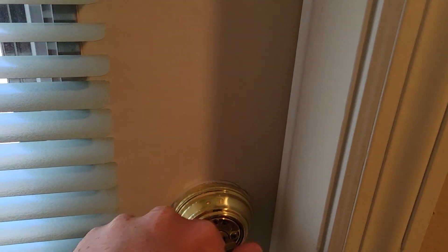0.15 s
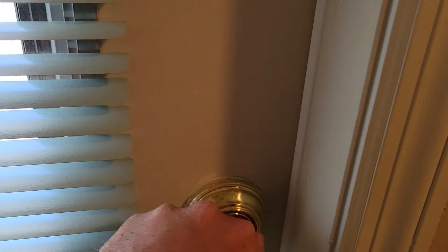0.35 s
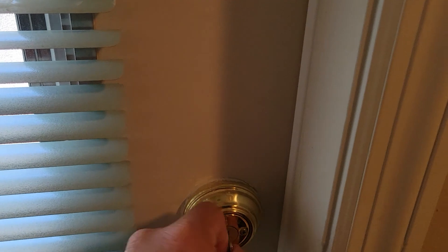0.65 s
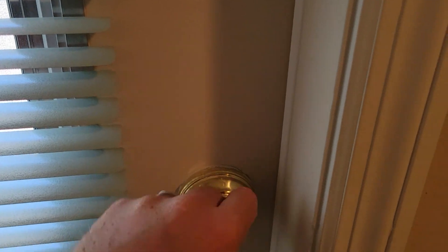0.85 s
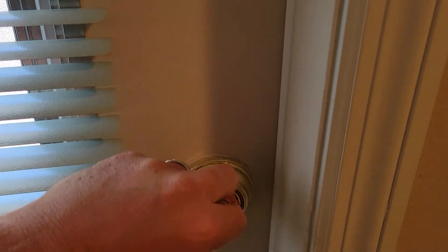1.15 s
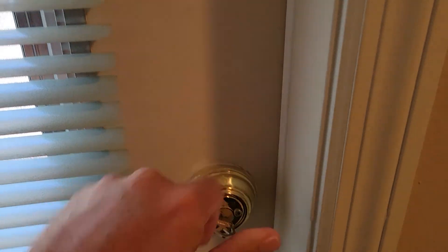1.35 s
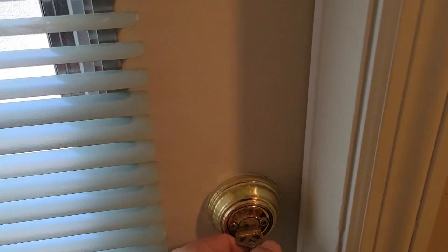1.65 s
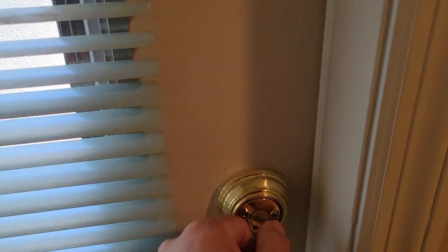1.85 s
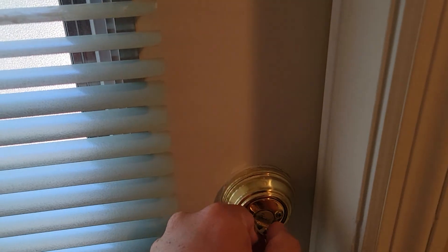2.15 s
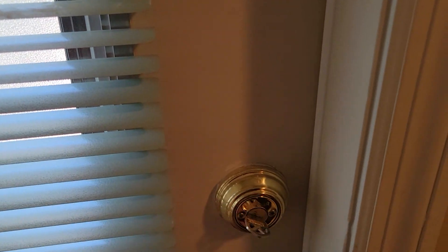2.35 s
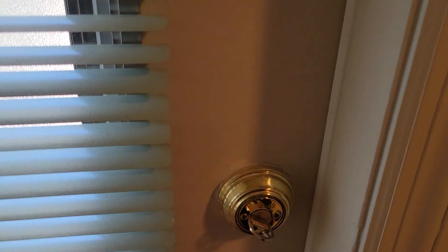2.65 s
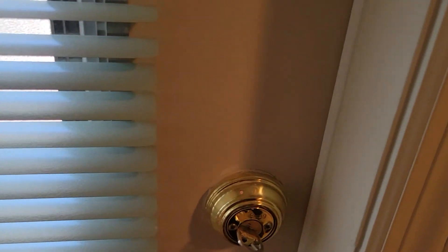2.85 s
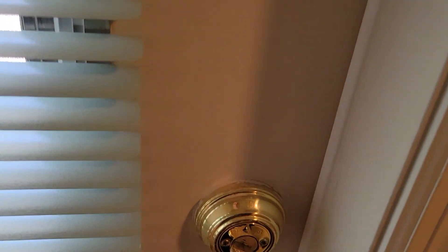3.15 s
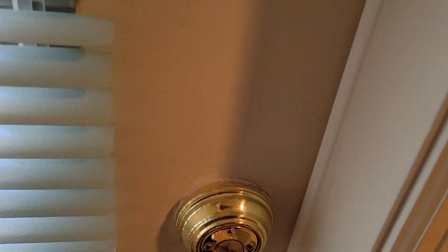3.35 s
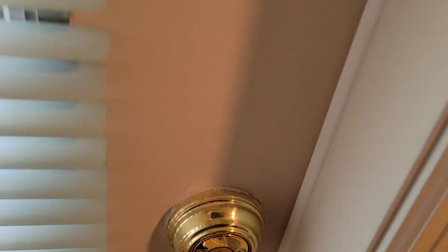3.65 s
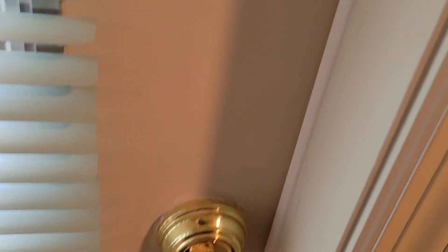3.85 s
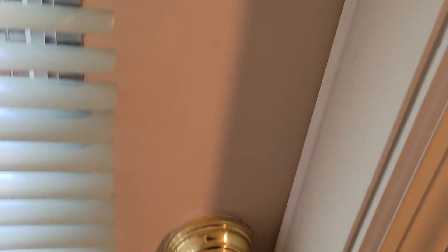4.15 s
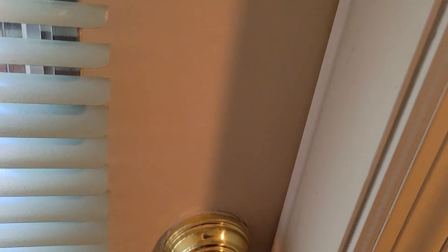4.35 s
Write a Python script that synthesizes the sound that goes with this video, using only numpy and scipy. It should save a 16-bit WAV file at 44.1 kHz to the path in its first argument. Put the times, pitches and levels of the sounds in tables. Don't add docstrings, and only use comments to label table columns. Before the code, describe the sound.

Inside a small, quiet hallway with low rumble and faint mains hum, a hand rustles on a brass knob. Light ticks and loose metal rattles come first, then a near pause. The stiff door knocks dully as it is tried, and finally shuts with a loud thump and bright latch snap. Close stereo microphone, short dry reverberation.

```python
import sys
import numpy as np
from scipy import signal
from scipy.fft import rfft, irfft, next_fast_len
from scipy.io import wavfile

SR = 44100
rng = np.random.default_rng(int(sys.argv[2]) if len(sys.argv) > 2 else 0)


def linear_from_db(decibels):
    return 10 ** (np.asarray(decibels, float) / 20)


def dump(signal):
    limited = np.clip(np.atleast_2d(signal).T, -1, 1)
    pcm = np.round(limited * 32767).astype(np.int16)
    wavfile.write(sys.argv[1], SR, pcm)


N = 198062

# frequency in Hz, level in dB rms.
HUM = [
    (118.4, -61.5),
    (242.2, -87),
]
# frequency in Hz, level in dB per Hz.
AIR_SPECTRUM = [(15, -37), (25, -12), (60, 0), (87, -57), (103, -37.5), (124, 7), (187, -57), (252, -13),
                (470, -26), (553, -25), (669, -31), (2210, -31), (8600, -45.5), (15200, -55), (16500, -63)]
# frequency in Hz, correlation up to 1 (below 0 counts as
AIR_LIKENESS = [(60, 0.68), (240, 0.56), (950, -0.62), (3770, -0.13), (15000, -0.02)]
# frequency in Hz, width in Hz, left gain in dB, right gain in dB.
PORT_RESONANCES = [(8580, 2900, 0, -32), (13400, 430, -4, 5.5)]

# frequency in Hz, level in dB, t60 in seconds.
LEAF_MODES = [(50, -6.5, 0.074), (71.6, -7, 0.22), (94.5, 0.5, 0.27), (126, 2, 0.19), (143.6, -1.5, 0.24)]
# frequency in Hz, level in dB, t60 in seconds.
PANEL_MODES = [(174.8, -4, 0.3), (220.7, 1.5, 0.16), (266.2, 2, 0.12), (306.5, -4, 0.27), (372.5, -4, 0.15)]
# frequency in Hz, level in dB, t60 in seconds.
KNOB_MODES = [(517.4, -3, 0.03), (551.2, -7.5, 0.084), (611, -3, 0.015), (670, -11, 0.052),
              (835, -2.5, 0.0093), (832, -4, 0.023)]
# frequency in Hz, level in dB, t60 in seconds.
LATCH_MODES = [(1160, -6, .02), (1300, -3, .025), (1480, -3, .025), (1600, -3, .025), (1760, -3, .025),
               (1960, -3, .02), (2200, -4, .015), (2600, -6, .015)]
# frequency in Hz, level in dB, t60 in seconds.
SPRING_MODES = [(3080, -4, .008), (3250, -3, .012), (3450, -6, .007)]
# frequency in Hz, level in dB, t60 in seconds.
HINGE_MODES = [(15000, 0, .012)]

# time in seconds, rubbing level in dB.
GRIP = [(0.0, -53.5), (0.21, -55), (0.59, -60.5), (0.72, -51.5), (1.01, -56.5), (1.37, -54), (1.6, -54),
        (2.0, -58.5), (2.26, -76.5), (2.66, -55.5), (3.0, -57.5), (3.06, -46), (3.15, -54), (3.659, -55.5),
        (3.75, -45.5), (3.83, -44), (4.0, -39), (4.3, -59.5)]
# peak time in seconds, hiss in dB, creep in dB.
LURCHES = [
    (1.01, -76, -43.5),
    (2.79, -76, -50.5),
    (3.06, -54, -40),
    (3.19, -61, -48),
    (3.36, -57, -42.5),
    (3.75, -45.5, -57),
    (3.94, -32, -30.5),
    (4.05, -52.5, -45.5),
    (4.38, -54, -55),
    (4.47, -65, -41.5),
]
# peak time in seconds, level in dB.
WHINES = [
    (0.25, -62),
    (1.37, -59.5),
    (1.43, -58.5),
    (1.55, -63),
    (1.97, -61.5),
    (3.51, -65.5),
    (4.02, -44.5),
    (4.13, -68),
]
# peak time in seconds, level in dB.
SQUEAKS = [
    (3.625, -79.5),
    (4.11, -84),
]
# time in seconds, boom in dB, panel level in dB, push in seconds.
KNOCKS = [(2.621, -37, -48.5, 0.008), (2.829, -44, -57, 0.0009), (2.969, -33, -46.5, 0.0071),
          (3.029, -20.5, -44.5, 0.0096), (3.11, -31.5, -50, 0.01), (3.198, -48, -36.5, 0.026),
          (3.265, -24.5, -34.5, 0.0073), (3.296, -33, -31, 0.00086), (3.586, -48.5, -63, 0.0075),
          (3.769, -36.5, -41, 0.0012), (3.809, -33, -39.5, 0.0017), (3.849, -16.5, -23.5, 0.0045),
          (3.869, -16.5, -21, 0.0028), (3.9, -20, -43.5, 0.004), (4.309, -57, -60.5, 0.005),
          (4.36, -51.5, -57, 0.0056), (4.408, -46.5, -51.5, 0.0035)]
# start in seconds, strength in dB,
# brightness in dB of tick over knob, chatter t60 in seconds.
CONTACTS = [(0.3173, -45.5, 12, 0.045), (0.6362, -33.5, 13.5, 0.029), (0.7287, -58, 3, 0.051),
            (0.9823, -52.5, -28.5, 0.16), (1.053, -63, -23, 0.057), (1.1104, -64, 9, .022),
            (1.1413, -40.5, -12.5, 0.087), (1.3661, -56, -21, 0.079), (1.5597, -69, 13, 0.04),
            (1.6731, -47, -15, 0.1), (1.7899, -45, -9.5, 0.059), (1.8401, -54.5, -18, 0.06),
            (1.8494, -48.5, -21, 0.05), (1.898, -58, -23, 0.018), (2.6046, -54.5, -18.5, 0.075),
            (2.827, -59, -25, .027), (2.9634, -51, -11, 0.29), (2.9779, -54, 13, 0.15),
            (3.1985, -43.5, -18, 0.044), (3.2659, -40.5, 9, 0.08), (3.455, -47.5, -6.5, 0.037),
            (3.602, -59, -3, 0.06), (4.174, -60.5, -30.5, 0.048)]
# start in seconds, tick in dB.
FLICKS = [(0.9823, -65), (1.053, -64), (1.073, -60.5), (1.6713, -53.5), (1.7431, -50.5), (1.7899, -61),
          (1.8401, -64), (2.6046, -62.5), (2.9634, -59), (3.2659, -45), (3.757, -52.5), (3.7804, -38),
          (3.8493, -15), (4.2877, -61)]
# start in seconds, strength in dB, brightness in dB.
SLIDES = [(0.1634, -72, -4), (0.5344, -60, -28), (0.5864, -56, -27), (0.625, -42, 7), (0.6524, -36, -4),
          (0.7144, -54.5, -27), (0.8714, -68, -24), (1.0004, -46.5, -17), (1.0444, -57.5, -3),
          (1.0874, -59.5, -33), (1.1604, -50, -35.5), (1.2074, -70, -7), (1.3844, -55.5, -28),
          (1.6114, -58, -23), (1.6944, -47, -20), (1.7344, -50, -25), (1.8114, -57, -27),
          (2.3034, -62, -21), (2.7764, -65, -15)]
# start in seconds, strength in dB, brightness in dB,
# chatter t60 in seconds.
SCUFFS = [
    (3.004, -39, -1, 0.13),
    (3.0204, -38, 9.5, 0.069),
    (3.186, -42.5, -8, 0.039),
    (3.2084, -53, -18, 0.26),
    (3.2914, -54, -27, 0.073),
]
# start in seconds, strength in dB, brightness in dB,
# chatter t60 in seconds.
STRIKES = [
    (3.7804, -53, 27, 0.21),
    (3.8085, -23.5, 9, 0.039),
    (3.8473, -27, 13.5, .04),
    (3.8593, -29, 30.5, 0.068),
]
# start in seconds, strength in dB, brightness in dB,
# chatter t60 in seconds.
GRINDS = [(3.685, -59, 4, 0.6), (3.7644, -43, -28, 0.032), (3.816, -27, -2, 0.077), (3.837, -15.5, 5, 0.09),
          (3.8524, -21, 8, 0.052), (3.8674, -31.5, 18.5, 0.3), (3.8914, -32, 25, 0.17),
          (4.3066, -56, -20, 0.16), (4.34, -49, -16.5, .1), (4.3564, -41, -26.5, 0.05),
          (4.3704, -42, -17, 0.075), (4.3854, -55, -27, 0.089), (4.4114, -58, -32.5, .11),
          (4.4404, -57, 12, .068)]
# start in seconds, level in dB, pitch in Hz.
PINGS = [(0.3175, -40, 1910), (0.3175, -42.5, 1650), (0.3167, -39, 2410), (0.654, -32.5, 1290),
         (1.111, -67, 1510), (1.144, -38, 1234), (1.142, -46, 1830), (1.367, -47, 1840), (1.558, -53, 3260),
         (1.675, -39.5, 817), (1.675, -45, 1260), (1.7901, -33.5, 1760), (1.848, -42.5, 1760),
         (1.848, -43, 560), (1.898, -47, 511), (2.83, -54, 696), (3.02, -38.5, 1710), (3.199, -31.5, 1800),
         (3.267, -28, 4870), (3.268, -30, 8160), (3.457, -38, 1465)]
# start in seconds, level in dB, pitch in Hz.
SHUT_PINGS = [(3.808, -25.5, 826), (3.807, -25, 1380), (3.812, -38, 2200), (3.843, -18.5, 798),
              (3.846, -29.5, 1380), (3.859, -25, 1667), (3.879, -33.5, 3620), (3.89, -22, 260.8),
              (3.893, -23.5, 5100), (3.85, -24.5, 6340), (4.309, -44.5, 1740), (4.362, -42, 911),
              (4.364, -44, 2240), (4.374, -36, 1620), (4.366, -36.5, 287), (4.385, -36, 590),
              (4.409, -40, 512)]
# gain of one port in dB, left then right.
PING_SIDES_DB = [
    [2],
    [-6],
]


def rms_one(x):
    return x / np.sqrt(np.mean(x ** 2) + 1e-20)


def at_hz(points, hz):
    point_hz, value = np.array(points).T
    return np.interp(np.log(hz), np.log(point_hz), value)


def band(x, low_hz, high_hz):
    return signal.sosfilt(signal.butter(2, [low_hz, high_hz], "band", fs=SR, output="sos"), x + 1e-18)


def drift(rate_hz):
    r = np.exp(-80 * np.pi * rate_hz / SR)
    slow = signal.lfilter([1], [1, -2 * r, r * r], rng.standard_normal(N // 40 + 2002))[2000:]
    return np.interp(np.arange(N) / 40, np.arange(len(slow)), rms_one(slow))


def body(force, modes):
    out = 0
    for k, (hz, level_db, t60_s) in enumerate(modes):
        r, w = linear_from_db(-60 / (t60_s * SR)), 2 * np.pi * hz / SR
        gain = (-1) ** k * linear_from_db(level_db) * np.sin(w)
        out = out + signal.lfilter([0, gain], [1, -2 * r * np.cos(w), r * r], force + 1e-18)
    return out


def grains(per_s, spread_db, size):
    hit = rng.random(size) < per_s / SR
    strength = linear_from_db(spread_db * np.minimum(rng.exponential(1, size), 4))
    return rms_one(hit * strength * rng.choice([-1, 1], size))


def swells(rows, rise_db_per_s, fall_db_per_s):
    s, *peaks_db = np.transpose(rows)
    late = np.arange(N) / SR - s[:, None]
    loss_db = np.maximum(-rise_db_per_s * late, fall_db_per_s * late)
    return [np.max(db[:, None] - loss_db, axis=0) for db in peaks_db]


def hum():
    t = np.arange(N) / SR
    return sum(np.sqrt(2) * linear_from_db(db + 1.4 * drift(1.2)) * np.sin(2 * np.pi * hz * t) for hz, db in HUM)


def air():
    out, edges = 0, 22 * 2 ** np.arange(0, 9.8, .5)
    white = rng.standard_normal((2, 2, N))
    for k, (low, high) in enumerate(zip(edges, edges[1:])):
        mid, side = band(white[k % 2], low, high)
        hz = np.sqrt(low * high)
        alike = np.clip(at_hz(AIR_LIKENESS, hz), 0, 1)
        stereo = np.sqrt(1 + alike) * mid + np.sqrt(1 - alike) * side * [[1], [-1]]
        out = out + linear_from_db(at_hz(AIR_SPECTRUM, hz) + 1.3 * drift(2)) * stereo
    return linear_from_db(-58.5) * rms_one(out)


def hall(x):
    t60_s, wall_cut_hz = 0.15, 7000
    size = next_fast_len(N + SR)
    hz = np.arange(size // 2 + 1) * SR / size
    out = np.zeros((2, len(hz)), complex)
    for k, lag_s in enumerate(rng.uniform(0.0051, .03, 20)):
        delay = np.exp(-2j * np.pi * hz * lag_s)
        loop = linear_from_db(-60 * lag_s / t60_s) * delay / (1 + 1j * hz / wall_cut_hz * lag_s * 15)
        out[k % 2] += (-1) ** (k // 2) * loop / (1 - loop)
    return irfft(out * rfft(x, size), size)[:, :N]


def door(creep_db):
    lead_s = 0.00756
    boom, panel = linear_from_db(creep_db - 35) * linear_from_db(2.03 * drift(5.3)) * rng.standard_normal((2, N))
    for s, boom_db, panel_db, push_s in KNOCKS:
        push = np.hanning(round(np.clip(push_s, .001, .02) * SR))
        at = round((s - lead_s) * SR)
        boom[at:at + len(push)] += linear_from_db(boom_db) * push / push.sum()
        panel[at] += linear_from_db(panel_db - 1.5)
    return body(boom, LEAF_MODES) + band(body(panel, PANEL_MODES), 110, 580)


def whines(metal_rub, knob_rub, whine_db):
    squeak_db, = swells(SQUEAKS, rise_db_per_s=798.5, fall_db_per_s=250.5)
    spring = linear_from_db(whine_db - 15.5) * body(knob_rub, SPRING_MODES)
    return spring + linear_from_db(squeak_db) * body(metal_rub, HINGE_MODES)


def pings():
    out = np.zeros(N + SR)
    for s, db, hz in PINGS + SHUT_PINGS:
        t60_s = 48 / hz
        taps = np.zeros(SR // 4)
        taps[[0, *rng.integers(20, 180, 3)]] = 1, *rng.uniform(-.6, .6, 3)
        modes = [(hz, db, t60_s), (hz * 1.8, db - 45.5, t60_s * 1.4)]
        out[round(s * SR):][:len(taps)] += body(taps, modes)
    return out[:N]


def shares(rows, latch_db, sizzle_db):
    return [(s, db + bright_db / 2, sizzle_db, db + latch_db, db - bright_db / 2, t60_s)
            for s, db, bright_db, t60_s in rows]


def touches(rows, blow, rise_s):
    force, t = np.zeros((4, 2, N + SR)), np.arange(SR // 4) / SR
    for s, tick_db, sizzle_db, latch_db, knob_db, t60_s in rows:
        shared, *own = grains(7000, 4.25, size=(3, len(t)))
        group_t60_s = np.clip(t60_s, .004, .5) * np.array([[.6], [.45], [1.01], [1.2]])
        fall = linear_from_db(-60 * t / group_t60_s) * np.minimum(t / rise_s, 1)
        burst = 0.26 * (shared + 1.884 * np.array(own)) * fall[:, None]
        burst[..., 0] += blow * np.array([[1], [.55], [1], [1]])
        at = round(s * SR)
        group_db = np.array([tick_db, tick_db + sizzle_db, latch_db, knob_db])
        force[..., at:at + len(t)] += linear_from_db(group_db)[:, None, None] * burst
    return force[..., :N]


def sharp_forces():
    flick_bright_db, flick_t60_s = 11, 0.057
    flicks = [(s, db - flick_bright_db / 2, flick_bright_db, flick_t60_s) for s, db in FLICKS]
    rows = shares(CONTACTS, latch_db=-7, sizzle_db=-11.5) + shares(flicks, latch_db=-7, sizzle_db=6)
    rows = rows + shares(STRIKES, latch_db=2, sizzle_db=-4.5)
    return touches(rows, blow=4, rise_s=.0003)


def soft_forces():
    slide_t60_s = 0.066
    rows = shares([(*row, slide_t60_s) for row in SLIDES], latch_db=-5, sizzle_db=-9)
    rows = rows + shares(SCUFFS, latch_db=-13, sizzle_db=-2.5) + shares(GRINDS, latch_db=-2, sizzle_db=2)
    return touches(rows, blow=0, rise_s=0.0093)


def lock(metal_db, knob_db, whine_db):
    tick, sizzle, latch, knob = sharp_forces() + soft_forces()
    metal_rub, knob_rub = grains(5000, 3.4, size=(2, 2, N))
    tick = tick + linear_from_db(metal_db - 10) * metal_rub
    sizzle = sizzle + linear_from_db(metal_db - 12.5) * metal_rub
    latch = latch + linear_from_db(knob_db - 29.0) * knob_rub
    knob = knob + linear_from_db(knob_db - 13.5) * knob_rub * linear_from_db(4.6 * drift(14.3))
    bright = linear_from_db([[11], [9]]) * band(tick, 2050, 6230)
    top = linear_from_db([[9], [8]]) * band(sizzle, 11240, 22000)
    middle = linear_from_db(17) * (band(latch, 573, 2860) + linear_from_db(-26) * body(latch, LATCH_MODES))
    low = band(linear_from_db(-12.0) * body(knob, KNOB_MODES) + linear_from_db(12.5) * band(knob, 256, 952), 489, 1436)
    ringing = linear_from_db(PING_SIDES_DB) * pings()
    return bright + top + middle + low + ringing + whines(metal_rub, knob_rub, whine_db)


def scene():
    knob_db = np.interp(np.arange(N) / SR, *np.transpose(GRIP))
    effort_db = 0.65 * (knob_db + 60)
    hiss_db, creep_db = swells(LURCHES, rise_db_per_s=196, fall_db_per_s=251)
    whine_db, = swells(WHINES, rise_db_per_s=150, fall_db_per_s=120)
    brass = lock(np.maximum(hiss_db, effort_db - 74), knob_db, whine_db)
    leaf = door(np.maximum(creep_db, effort_db - 63))
    left, right = brass + linear_from_db([[0], [-3]]) * leaf
    right_lag = 11
    near = np.array([left, np.r_[np.zeros(right_lag), right[:-right_lag]]])
    return near + linear_from_db(-14.5) * hall(brass[0] + linear_from_db(-4.5) * leaf) + air() + hum()


def band_limit(x):
    return signal.sosfilt(signal.butter(12, 16810, fs=SR, output="sos"), x)


def record(dry):
    for hz, width_hz, *sides_db in PORT_RESONANCES:
        r = np.exp(-np.pi * width_hz / SR)
        poles = [1, -2 * r * np.cos(2 * np.pi * hz / SR), r * r]
        peak = signal.lfilter([(1 - r * r) / 2, 0, (r * r - 1) / 2], poles, dry)
        dry = dry + (linear_from_db(sides_db)[:, None] - 1) * peak
    rounded = 1.15 * np.tanh(dry / 1.15)
    mix = signal.sosfilt(signal.cheby2(12, 42, 16150, fs=SR, output="sos"), rounded)
    return band_limit(mix)


dry = scene()
out = record(dry)
dump(out)
```